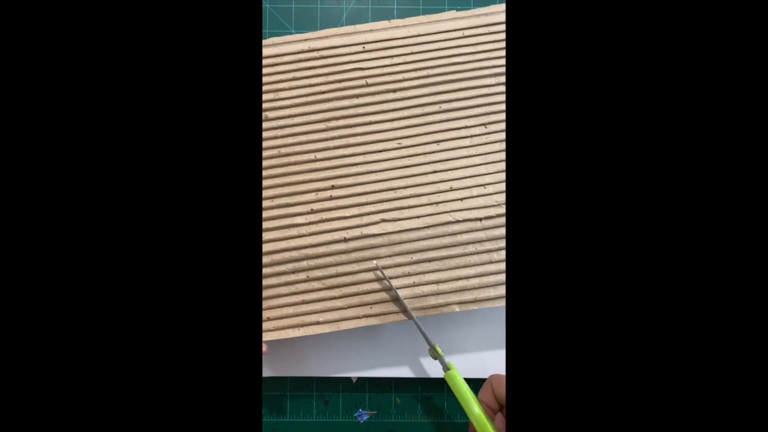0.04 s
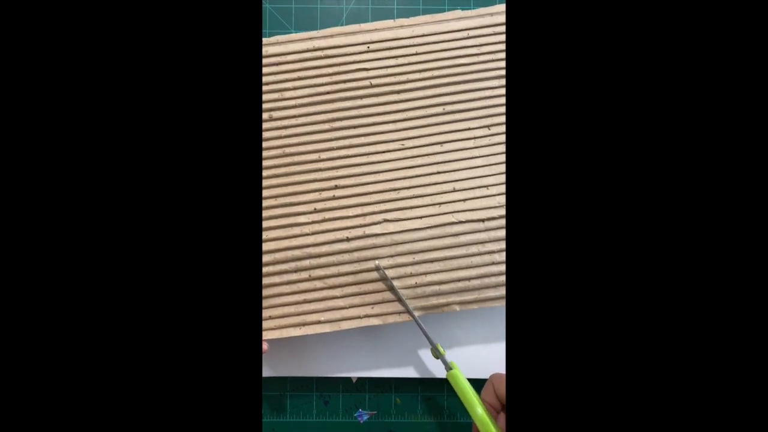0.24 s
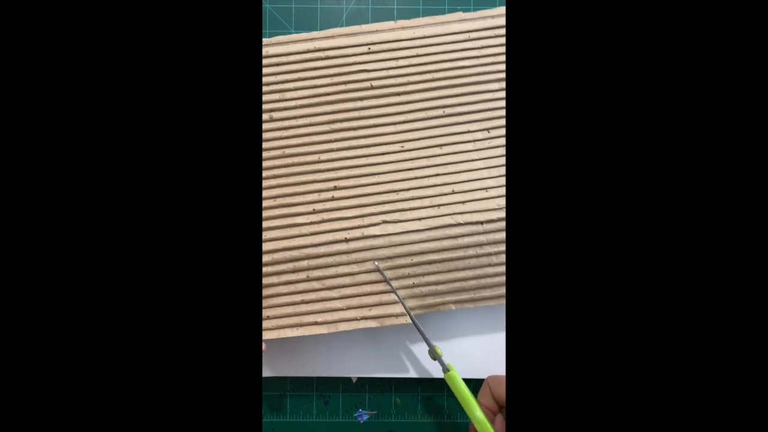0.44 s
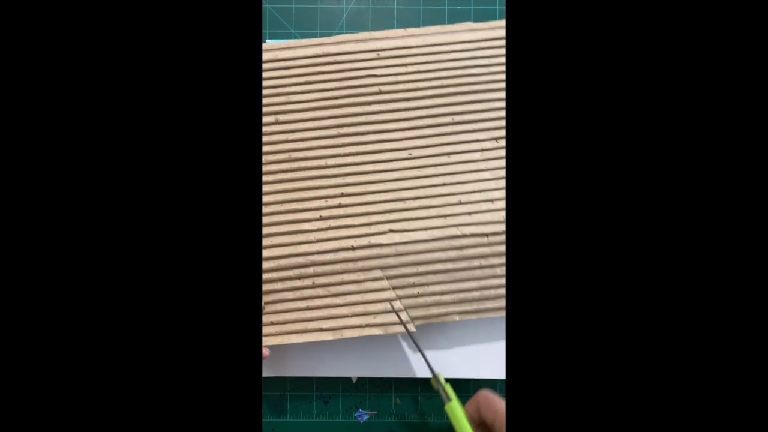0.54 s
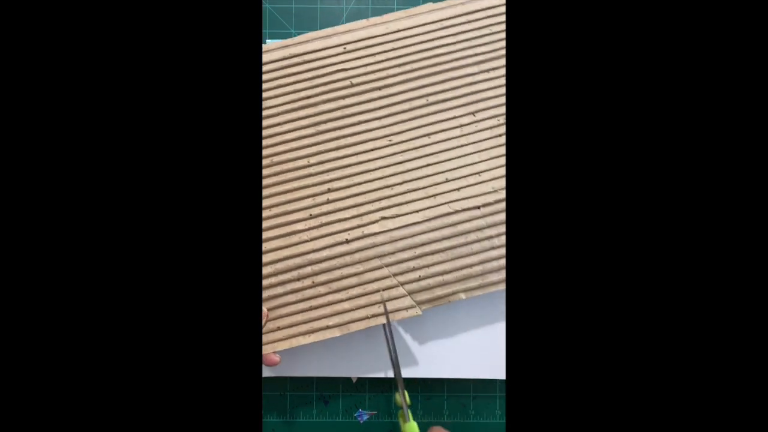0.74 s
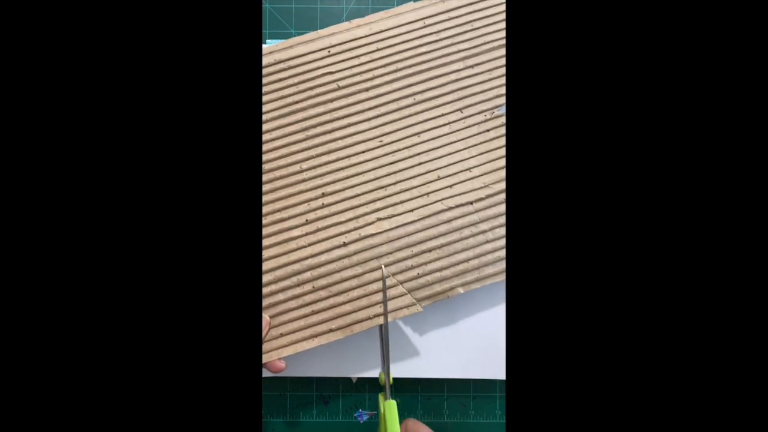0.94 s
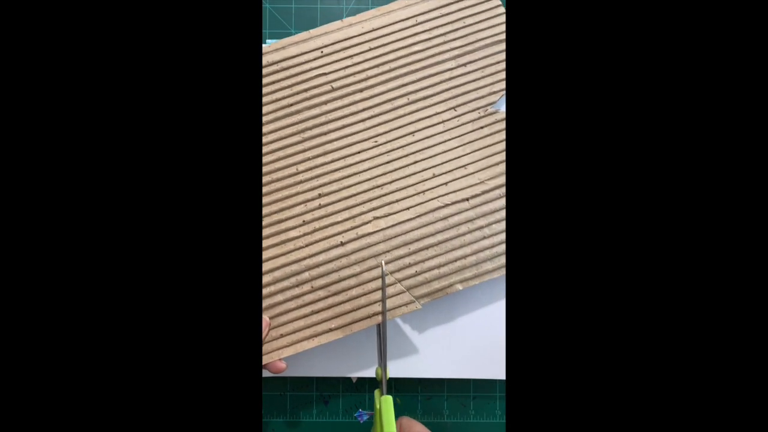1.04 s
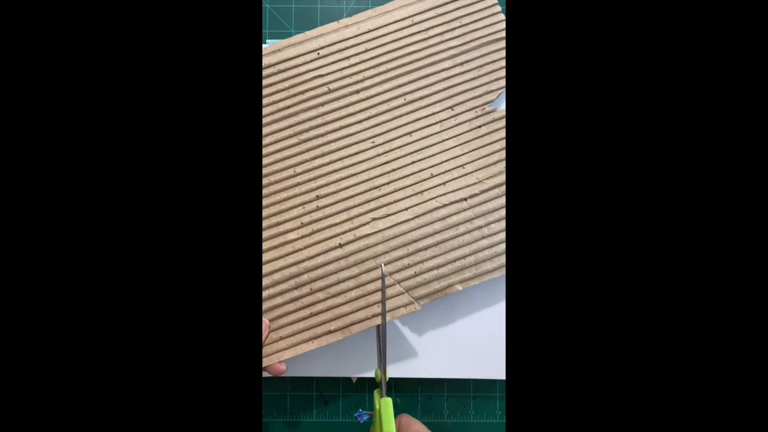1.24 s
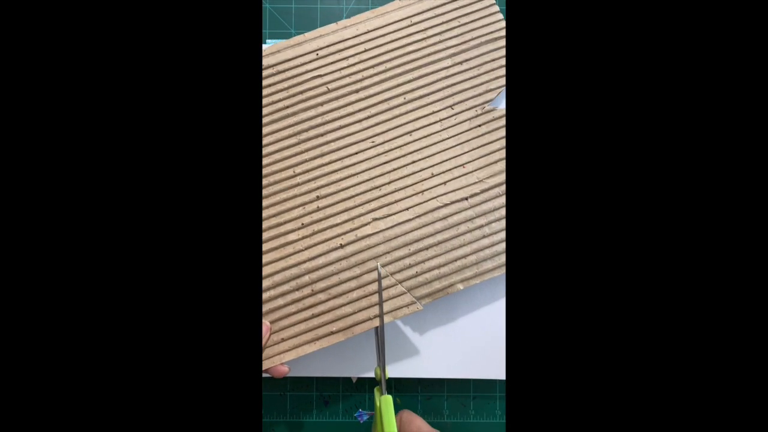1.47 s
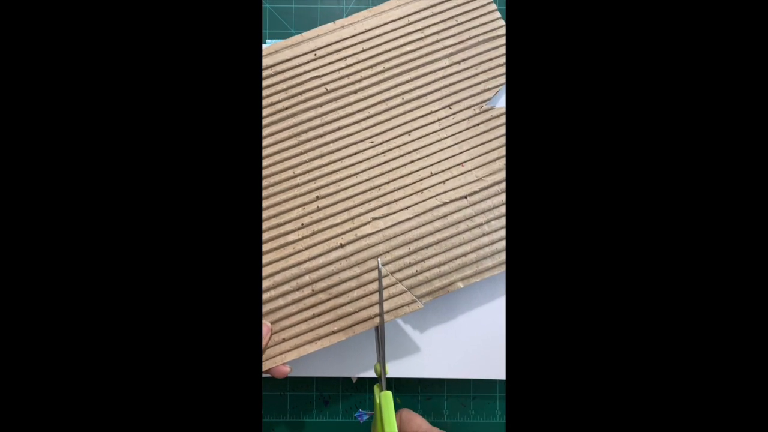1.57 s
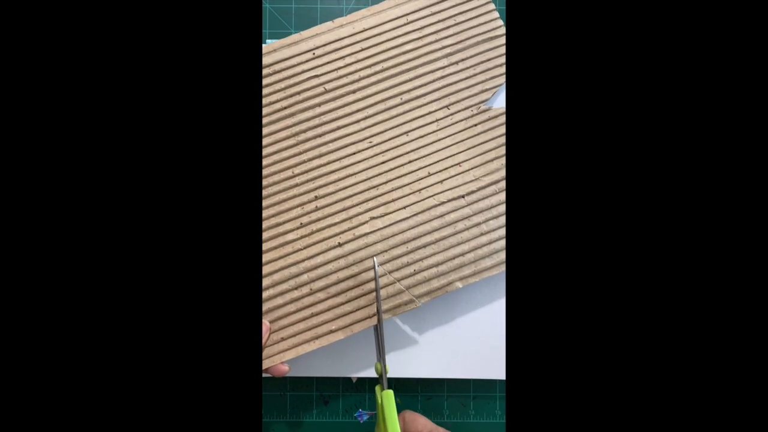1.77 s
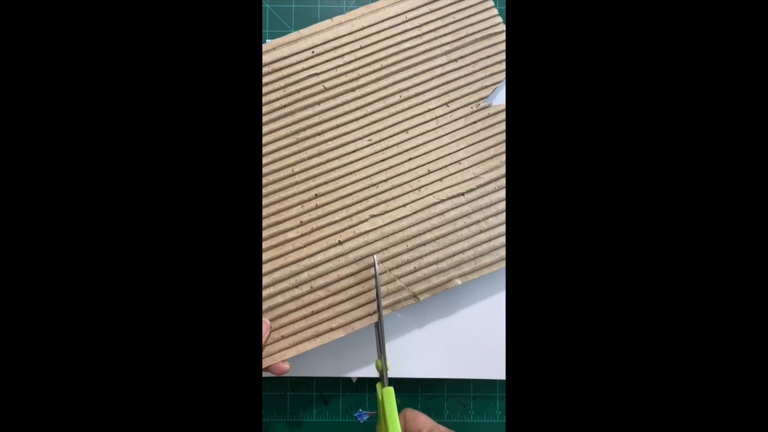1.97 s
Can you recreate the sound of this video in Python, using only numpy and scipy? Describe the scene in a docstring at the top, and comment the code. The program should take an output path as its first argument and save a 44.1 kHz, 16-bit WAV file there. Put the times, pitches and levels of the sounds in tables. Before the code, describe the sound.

Scissors cut corrugated cardboard, close up in stereo. Crunchy snips with hollow knocks and small flaps grow louder from 0.0 to 0.3 s, the sharpest at 0.32 with a metallic tick, another at 0.5. The sheet scrapes and turns from 0.45 to 1.0, rasping downward. Faint groans and rustles follow until 1.5, then softer cuts at 1.65, 1.75, 1.83 and 1.98. Low room hum, short reflections.

```python
"""Scissors cut corrugated cardboard close to a pair of microphones in a softly humming classroom.
First five ribs give way: each bursts in a few milliseconds of tiny fibre snaps, then the sheet knocks and flaps.
Next the cardboard sheet slides and turns on the desk: filtered random grains rub, and a band rasps downward.
Two faint groans and two pushes follow, then four more ribs, the first leaving a low hollow ring.
Throughout, decaying noise tails stand for the soft reflections from desk and walls."""
import sys
import numpy as np
from scipy import signal
from scipy.fft import rfft, irfft, next_fast_len
from scipy.io import wavfile
from scipy.ndimage import map_coordinates

SR = 44100
rng = np.random.default_rng(int(sys.argv[2]) if len(sys.argv) > 2 else 0)


def log_audio(samples):
    """Write samples as a 16-bit WAV file to the path given in sys.argv[1]."""
    # one column per channel
    frames = np.atleast_2d(samples).T
    # limit to full scale, then quantise
    limited = np.clip(frames, -1, 1)
    pcm = np.round(limited * 32767).astype(np.int16)
    wavfile.write(sys.argv[1], SR, pcm)


N = 88508
T = np.arange(N) / SR  # time of each sample [s]
SIDES = np.array([[.5], [-.5]])  # each side, left then right, takes half of a difference


def amp(db):
    """Turn decibels into a gain."""
    return 10 ** (np.asarray(db) / 20)


def unit(x):
    """Scale to an average (rms) level of 1."""
    return x / np.sqrt(np.mean(x ** 2) + 1e-20)


def along(points, hz):
    """Read a curve of (frequency, value) points on a logarithmic frequency axis."""
    f, v = np.transpose(points)
    return np.interp(np.log(hz + 1), np.log(f + 1), v)


def filtered(x, response):
    """Multiply the spectrum of x by a response that depends on frequency."""
    m = next_fast_len(N + SR // 4)
    hz = np.fft.rfftfreq(m, 1 / SR)
    return irfft(rfft(x, m) * response(hz), m)[..., :N]


# how an event's treble lift spreads; the filter's overall level is evened out afterwards,
# so the lift itself is the step from low to high: (frequency [Hz], multiple of the lift)
TREBLE_SPREAD = [(1200, 2), (8000, 3)]


def coloured(x, colour, treble_db=0, size=2048):
    """Give x a tone colour with a filter of energy 1 that sounds only after its input."""
    hz = np.fft.rfftfreq(size, 1 / SR)
    level_db = along(colour, hz) + treble_db * along(TREBLE_SPREAD, hz)
    # folding the cepstrum forward in time gives a minimum-phase filter
    cepstrum = irfft(np.log(amp(level_db)))
    cepstrum[1:size // 2] *= 2
    cepstrum[size // 2 + 1:] = 0
    h = irfft(np.exp(rfft(cepstrum)))
    return signal.oaconvolve(x, h / np.linalg.norm(h))[:N]


def grains(rate, spread_db):
    """Scatter random clicks of uneven size, rate a second on average, rms 1."""
    happens = rng.random(N) < rate / SR
    sign = np.sign(rng.standard_normal(N))
    size = amp(spread_db * np.clip(rng.standard_normal(N), -2, 2))
    return unit(happens * sign * size)


def wobble(rate):
    """Draw a smooth random curve with rate knots a second."""
    return map_coordinates(rng.standard_normal(N // 20), [T * rate])


def swells(rows):
    """Loudness curve that rises to each peak and falls away."""
    total = 0
    for peak, rise, fall, db in rows:
        distance = np.abs(np.maximum((peak - T) / rise, (T - peak) / fall))
        total = total + amp(db) * np.exp(-distance ** 1.25)
    return total


def ring(s, modes, attack, loose=True):
    """Damped tones set off at time s; loose ones start in a random direction."""
    t, out = T[:SR // 4], np.zeros(N + SR)
    for hz, db, t60 in modes:
        sign = rng.choice([-1, 1]) if loose else 1
        decay = amp(db - 60 * t / t60) * (1 - np.exp(-t / attack))
        out[round(s * SR):][:len(t)] += sign * decay * np.sin(2 * np.pi * hz * t)
    return out[:N]


# left and right grow unalike with frequency: (frequency [Hz], level of the difference signal [dB])
WIDTH = [(100, -20), (900, -2), (2500, -2), (10000, 4.5)]


def widened(mid, side, extra_db=0):
    """Make left and right from a shared sound plus and minus a difference signal."""
    side = filtered(side, lambda hz: amp(along(WIDTH, hz) + extra_db))
    return np.array([mid + side, mid - side])


# tone colour of the room's rumble: (frequency [Hz], relative level [dB])
HUM_COLOUR = [(20, -26), (75, 0), (105, -1), (150, -8.5), (280, -17), (600, -15.5), (1500, -36.5),
              (10000, -43), (13000, -70.5)]
HUM_DB = -66


def room_noise():
    """Low steady rumble of the room, made of filtered noise."""
    mid, side = filtered(rng.standard_normal((2, N)), lambda hz: amp(along(HUM_COLOUR, hz)))
    return amp(HUM_DB) * unit(widened(mid, side, extra_db=8))


def tail(x, t60s):
    """Blurred stereo reflections: noise in which each frequency dies at its own speed."""
    hz, t, z = signal.stft(rng.standard_normal((2, SR // 2)), SR, nperseg=128)
    h = signal.istft(z * amp(-60 * t / along(t60s, hz)[:, None]), SR, nperseg=128)[1]
    h = np.pad(h / np.linalg.norm(h[0]), ((0, 0), (SR // 500, 0)))  # first reflection after 2 ms
    mid, side = signal.fftconvolve(x[None], h, axes=1)[:, :N]
    return widened(mid, side)


# how long the room answers: (frequency [Hz], time to fall by 60 dB [s])
ROOM_T60 = [(100, 0.41), (600, 0.1186), (3000, 0.2204), (9000, 0.1854), (14000, 0.044)]
ROOM_DB, DESK_DB, DESK_T60 = -16.5, -20.5, 0.104  # the desk's time [s] is alike at every frequency
ABSORB_HZ = 9350  # desk and walls swallow the top


def reflections(x):
    """Desk and walls send the sound back duller and spread out in time."""
    dull = filtered(x, lambda hz: 1 / (1 + (hz / ABSORB_HZ) ** 10))
    desk = amp(DESK_DB) * tail(dull, [(1000, DESK_T60)])
    return desk + amp(ROOM_DB) * tail(dull, ROOM_T60)


# two faint groans, then the low hollow ring after the sixth rib's cut:
# (peak time [s], rise [s], fall [s], level [dB])
LOW_SWELLS = [(1.198, 0.0132, 0.0208, -58), (1.24, 0.0116, 0.0089, -60.5), (1.657, 0.00853, 0.01795, -44)]
# tone colour of groans and ring: (frequency [Hz], relative level [dB])
LOW_TONE = [(200, -36), (460, -13), (580, 0), (730, -2.5), (900, -29.5), (3000, -36.5)]


def groans():
    """Random grains through a low resonance swell up as two faint groans and a hollow ring."""
    return swells(LOW_SWELLS) * coloured(grains(rate=700, spread_db=1.98), LOW_TONE)


GRAINS_PER_S, SNAPS_PER_S, GRAIN_SPREAD_DB = 6000, 300, 5
SNAPS_DB = -11  # relative to the fine grains


def friction():
    """Dense fine grains with sparse fibre snaps."""
    fine = grains(GRAINS_PER_S, GRAIN_SPREAD_DB)
    return fine + amp(SNAPS_DB) * grains(SNAPS_PER_S, GRAIN_SPREAD_DB)


# short pushes: (peak time [s], rise [s], fall [s], level [dB])
PUSH_TIMES = [(1.357, 0.0139, 0.0208, -48), (1.497, 0.02155, 0.0262, -48.5)]
# tone colour of the pushes: (frequency [Hz], relative level [dB])
PUSH_TONE = [(100, -19), (350, -7), (700, 3.5), (2600, 1.5), (4000, -3), (6000, -2), (10000, -12),
             (16000, -27.5)]


def pushes():
    """Short rustling strokes of friction, each rising and falling once."""
    return swells(PUSH_TIMES) * coloured(friction(), PUSH_TONE)


# one rasp of the sliding sheet: (peak time [s], rise [s], fall [s], level [dB]);
# the negative rise swaps the two, so it swells over the "fall" and stops quickly
RASP_STROKE = (0.82, -0.0033, 0.0835, -48)
RASP_HZ, RASP_SAG_HZ_PER_S, RASP_HALF_WIDTH_HZ = 2036.6, 8000, 560  # the first is the pitch at the peak


def rasp():
    """A resonance of the sheet's scrape falls in pitch as it turns."""
    hz = RASP_HZ - RASP_SAG_HZ_PER_S * (T - RASP_STROKE[0])
    band = filtered(friction(), lambda f: 1 / (1 + (f / RASP_HALF_WIDTH_HZ) ** 2))
    # multiplying by the falling tone moves the low band up around it
    falling_tone = np.cos(2 * np.pi * np.cumsum(hz) / SR)
    return swells([RASP_STROKE]) * unit(band * falling_tone)


# rubbing, mostly the sheet sliding on the desk:
# (time [s], level [dB], extra level of the board's hollow body [dB])
RUB_LEVELS = [(0, -58.5, 11.5), (.12, -65.5, 4.5), (.31, -76, 16.5), (.335, -42.5, -23.5),
              (0.402, -57.5, -4.5), (0.431, -56, 0), (0.45, -37.5, 5), (0.506, -41, 3.5), (0.516, -46, 2.5),
              (0.596, -45.5, -11.5), (.617, -41, -10.5), (.64, -43.5, 1), (.69, -45.5, 1),
              (0.718, -52.5, 8), (.85, -49, 2), (.9, -57.5, 6.5), (0.971, -49, 0.5), (1.042, -65.5, -13),
              (1.111, -59, -14), (1.17, -72, 0.5), (1.21, -61, -6.5), (1.255, -75.5, 8), (1.3, -67, 6),
              (1.43, -70.5, 15), (1.56, -61.5, -15.5), (1.59, -90.5, -4.5), (1.661, -54.5, 8.5),
              (1.709, -69, -23)]
# tone colour of the rubbing: (frequency [Hz], relative level [dB])
RUB_TONE = [(100, -12), (300, -12.5), (550, -3), (1050, -0.5), (2400, -0.5), (4000, -3), (6200, -0.5),
            (10000, -7), (16000, -32.5)]
BODY_HZ = 1438  # the board's body lies below this
FLUTTER_DB = 1.5


def rubbing():
    """Cardboard slides and rubs, with more or less of the board's body."""
    s, level_db, body_db = np.transpose(RUB_LEVELS)
    scrape = coloured(friction(), RUB_TONE)
    body = filtered(scrape, lambda hz: 1 / (1 + (hz / BODY_HZ) ** 4))
    loudness = amp(np.interp(T, s, level_db) + FLUTTER_DB * wobble(110))
    return loudness * (scrape - body + amp(np.interp(T, s, body_db)) * body)


# tone colour of a fibre fracture: (frequency [Hz], relative level [dB])
CRACKLE_TONE = [(60, -13.5), (250, -16), (550, 4.5), (1050, 5.5), (1800, -1), (2500, 4), (3500, -2.5),
                (5400, -1), (7800, -2), (10500, -6.5), (13500, -6), (16000, -23.5)]
FRACTURES_PER_S, FRACTURE_SPREAD_DB = 8500, 13.5
LEAD_S, EASE_DB, RELEASE_S = 0.001374, -2.5, 0.00181  # fibres strain, the crush eases, it stops
SNAP_AT, SNAP_S, SNAP_DB = 0.661, 0.0017, -10  # the liner breaks at this share of the crush


def crush(start, length, treble_db):
    """A burst of fibre fractures that builds up, eases, snaps and stops; rms 1 over its length."""
    outside = np.maximum(start - T, 0) / LEAD_S + np.maximum(T - start - length, 0) / RELEASE_S
    force = np.exp(-np.minimum(outside, 20)) * amp(EASE_DB * np.clip((T - start) / length, 0, 1))
    snap = np.exp(-((T - start - SNAP_AT * length) / SNAP_S) ** 2)
    force = force * (1 + amp(SNAP_DB) * snap)
    fractures = grains(FRACTURES_PER_S, FRACTURE_SPREAD_DB)
    burst = coloured(force * fractures, CRACKLE_TONE, treble_db)
    return burst / np.linalg.norm(burst) * np.sqrt(length * SR)


# small snags of the blade on single fibres: (start [s], level [dB], treble lift [dB])
SNAG_EVENTS = [(0.061, -40.5, -4), (0.4543, -32, -5), (0.481, -30, 20.5), (0.5019, -32.5, 2.5),
               (0.674, -32, -6.5), (0.691, -38.5, 3), (1.408, -51.5, 3.5), (1.618, -49, -2.5),
               (1.7756, -37.5, -2), (1.89, -49.5, 14.5)]
SNAG_S = 0.00207


def snags():
    """Single fibres catch on the edge and snap."""
    return sum(amp(db) * crush(s, SNAG_S, treble_db) for s, db, treble_db in SNAG_EVENTS)


FLAP_START_HZ, FLAP_END_HZ, FLAP_FALL_S, FLAP_PEAK_S = 339.6, 63.26, 0.00622, 0.01594


def flap(s):
    """A bending wave runs through the sheet; slower waves arrive later, so the bump falls in pitch."""
    t = np.maximum(T - s, 0)
    settling = FLAP_FALL_S * (1 - np.exp(-t / FLAP_FALL_S))
    cycles = FLAP_END_HZ * t + (FLAP_START_HZ - FLAP_END_HZ) * settling
    bump = t / FLAP_PEAK_S * np.exp(-.5 * (t / FLAP_PEAK_S) ** 2)
    return np.sin(2 * np.pi * cycles) * bump


HOLLOW_WIDTH_HZ, LINGER_T60 = 220, 0.0787  # the second in seconds


def hollow(s, hz):
    """The board's hollow resonance, a narrow band of noise, lingers unevenly from time s."""
    t = np.maximum(T - s, 0)
    resonance = lambda f: 1 / (1 + ((f - hz) / (HOLLOW_WIDTH_HZ / 2)) ** 2)
    band = unit(filtered(rng.standard_normal(N), resonance))
    return band * amp(-60 * t / LINGER_T60) * (1 - np.exp(-t * hz))


# ringing tones of the cardboard sheet: (frequency [Hz], relative level [dB], time to fall by 60 dB [s])
SHEET_MODES = [(234.8, -11, 0.045), (393.3, -10.5, 0.0923), (509, -4.5, 0.0462), (643, -11.5, 0.0444),
               (742.1, 1.5, 0.03), (860, -14, 0.064), (1072.3, 6, 0.0274), (1205.4, -3, .035)]
# ringing tones of the steel blades: (frequency [Hz], relative level [dB], time to fall by 60 dB [s])
BLADE_MODES = [(1600, -5, 0.04), (2750, -5, .012), (4530, -6, 0.011), (5290, 3, 0.01), (7500, 1, 0.009),
               (9800, 1, 0.0047)]
# ribs giving way: (start [s], crush length [s], crackle level [dB], treble lift [dB],
# sheet ring level [dB], knock pitch [Hz], knock level [dB], upper knock pitch [Hz],
# upper knock level [dB], flap level [dB], blade ring level [dB])
RIB_CUTS = [(0.0203, 0.00274, -28, 6.5, -44, 645, -44, 1440, -38, -51.5, -50),
            (0.1608, 0.00536, -25, -3, -35, 497, -20.5, 731, -24.5, -37.5, -39.5),
            (0.2534, 0.006572, -22, -1, -29, 390, -14.5, 1022, -27, -41, -46.5),
            (0.3161, .0036, -16.5, 9, -23, 540, -11, 925, -20, -37.5, -17.5),
            (0.506, 0.001648, -28, 1, -36.5, 522.6, -21.5, 1013, -34, -38, -61),
            (1.6472, 0.00876, -40, -3.5, -48.5, 637, -46, 1060, -44, -70.5, -48.5),
            (1.7542, 0.00488, -27, 1, -36, 647, -27, 981, -31.5, -47, -55.5),
            (1.827, 0.00555, -26.5, 0.5, -37.5, 642.7, -25, 969, -32.5, -44.5, -41.5),
            (1.9790, 0.003014, -24, 3, -43.5, 846, -34, 1176, -36, -41, -50)]
KNOCK_T60, UPPER_T60 = 0.01305, 0.0306  # time to fall by 60 dB [s]
LINGER_DB = -12.5  # hollow ring relative to the crackle


def ribs():
    """Each rib crackles, rings sheet and blades, and lets the sheet knock at two pitches and flap."""
    out = np.zeros(N)
    for (s, length, db, treble_db, sheet_db, knock_hz, knock_db,
         upper_hz, upper_db, flap_db, blade_db) in RIB_CUTS:
        middle, end = s + length / 2, s + length
        out += amp(db) * crush(s, length, treble_db)
        out += amp(sheet_db) * ring(middle, SHEET_MODES, attack=0.00139)
        out += amp(blade_db) * ring(middle, BLADE_MODES, attack=0.00023)
        out += amp(db + LINGER_DB) * hollow(middle, knock_hz)
        knocks = [(knock_hz, knock_db, KNOCK_T60), (upper_hz, upper_db, UPPER_T60)]
        out += ring(end, knocks, attack=0.000516, loose=False)
        out += amp(flap_db) * flap(end)
    return out


def at_microphones(x, phase):
    """Shift the phase so that the left microphone leads the right by the given curve."""
    return filtered(x, lambda hz: np.exp(1j * SIDES * along(phase, hz)))


# the cutting point lies further left: (frequency [Hz], extra lead of the left [radians])
CUT_LEAD = [(4600, 0), (8300, 1.3), (10800, 0)]


def scene():
    """The cutting and rubbing, their reflections from desk and walls, and the room's own noise."""
    cutting = ribs() + snags() + pushes() + groans()
    sliding = rubbing() + rasp()
    room = reflections(cutting + sliding)
    return at_microphones(cutting, CUT_LEAD) + sliding + room + room_noise()


# phase between the microphones: (frequency [Hz], lead of the left [radians])
MICROPHONE_LEAD = [(200, 0), (1300, -.12), (2500, .8), (3900, .8), (4600, 2.0), (5000, 4.6), (5500, 6.4),
                   (8900, 6.7), (10200, 8.15), (13000, 9.35)]
# level between the microphones: (frequency [Hz], left minus right [dB])
MICROPHONE_BALANCE = [(130, 0), (300, 1.2), (640, 1), (1400, .2), (3100, -2.5), (6800, -.6), (15000, 0)]
TOP_HZ = 16400


def record(dry):
    """The two microphones differ in phase and level; nothing passes above the band limit."""
    shifted = at_microphones(dry, MICROPHONE_LEAD)
    return filtered(shifted, lambda hz: amp(SIDES * along(MICROPHONE_BALANCE, hz)) * (hz < TOP_HZ))


dry = scene()
out = record(dry)
log_audio(out)
```